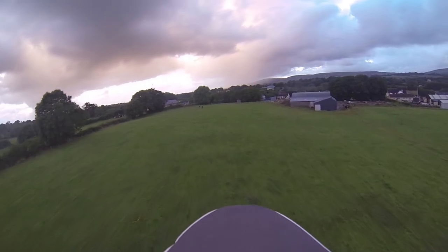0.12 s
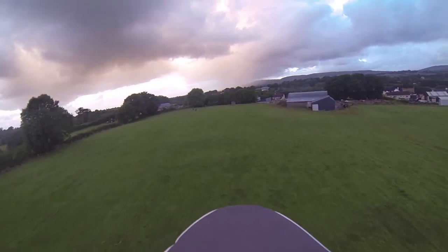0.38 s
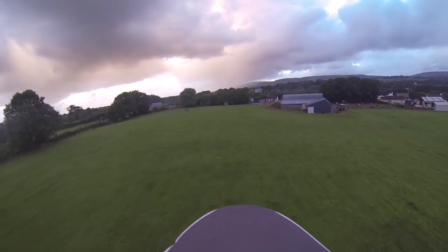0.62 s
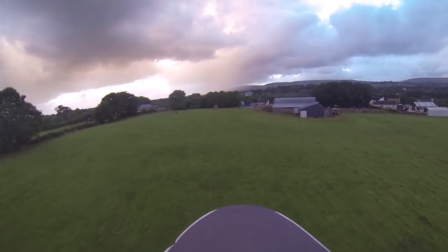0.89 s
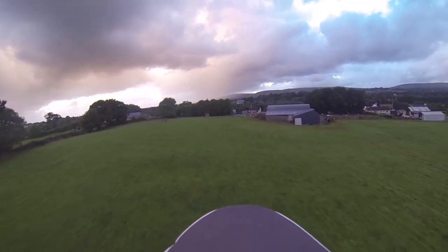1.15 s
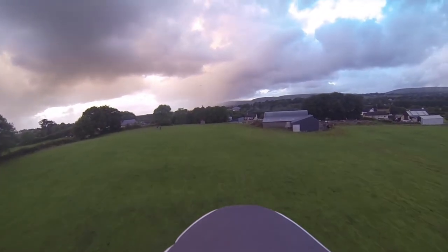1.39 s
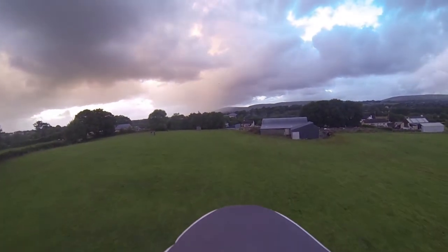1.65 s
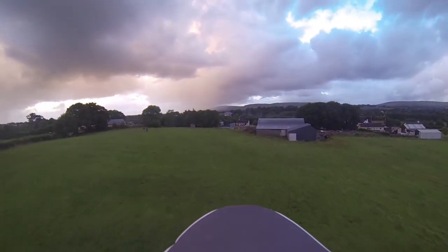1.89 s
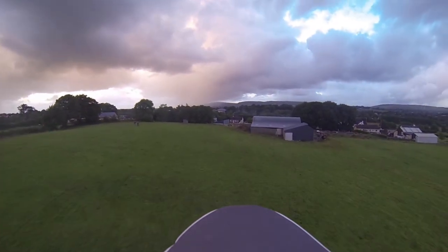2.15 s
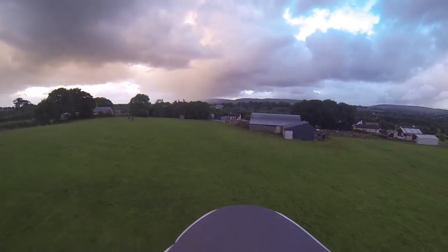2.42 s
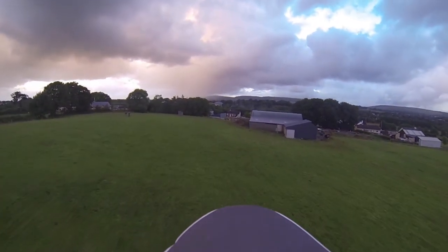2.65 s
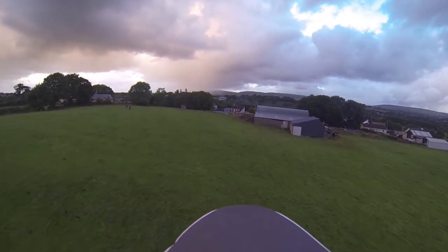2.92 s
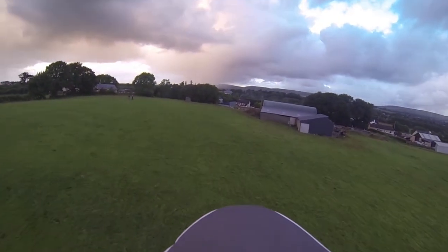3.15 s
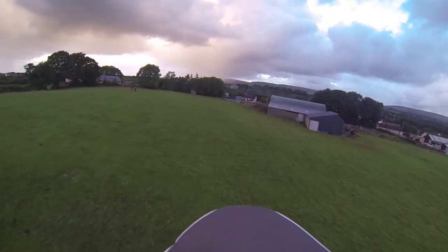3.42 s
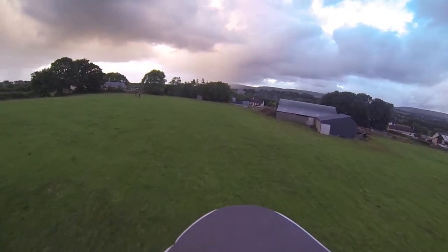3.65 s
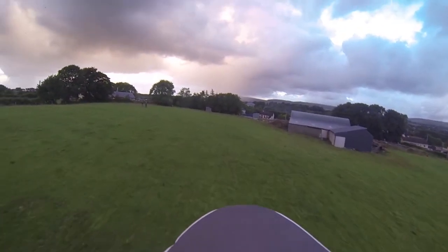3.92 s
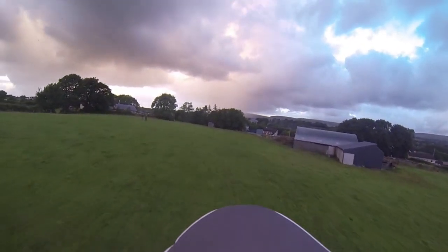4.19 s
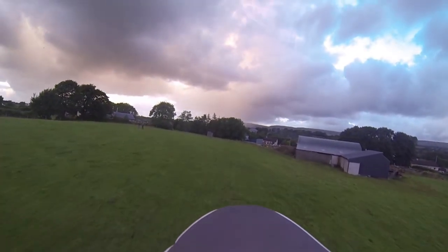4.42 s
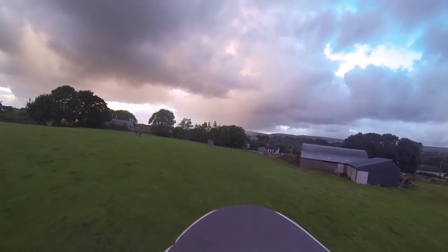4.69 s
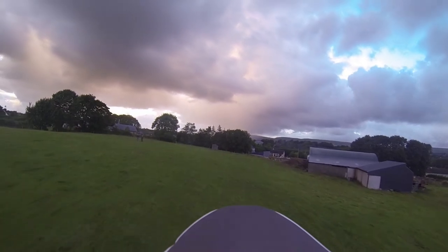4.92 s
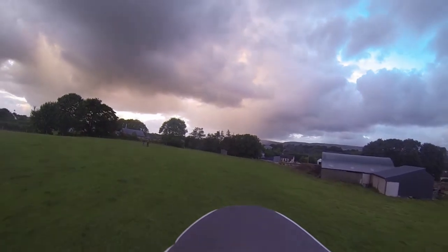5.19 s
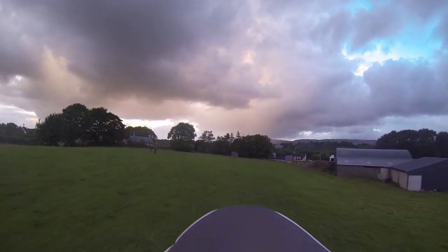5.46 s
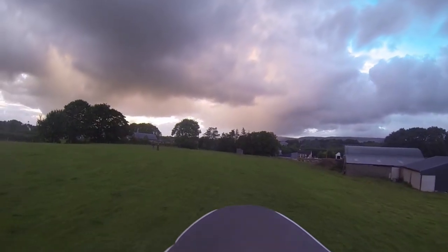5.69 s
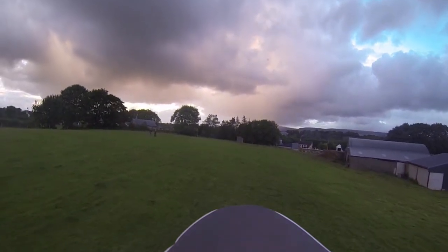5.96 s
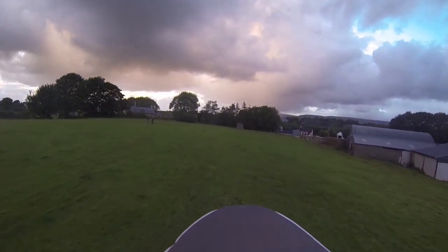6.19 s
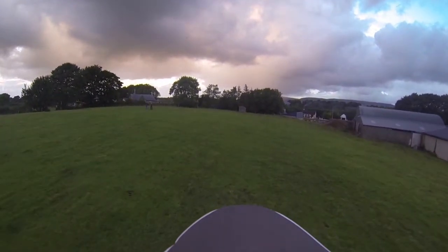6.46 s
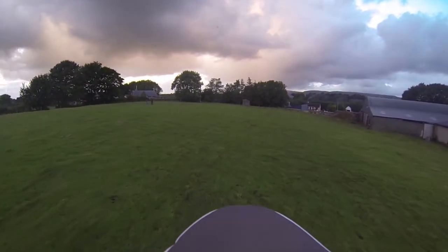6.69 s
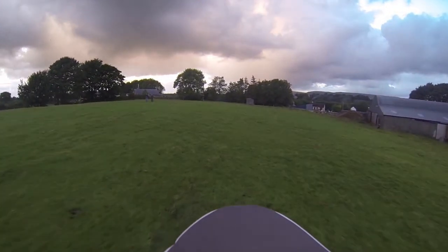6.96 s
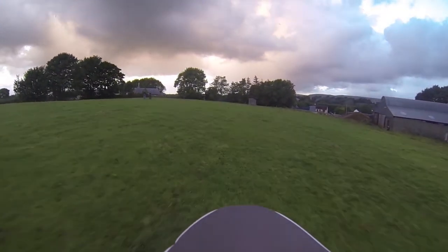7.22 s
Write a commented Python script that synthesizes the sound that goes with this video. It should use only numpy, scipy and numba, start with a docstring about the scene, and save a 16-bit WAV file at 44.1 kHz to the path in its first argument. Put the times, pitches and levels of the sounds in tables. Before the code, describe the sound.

Rushing airflow hiss with dense irregular wind thumps, tearing overload crackles and tiny servo ticks, heard aboard an unpowered gliding model plane.

```python
"""A small model aircraft glides over a field, motor idle, its microphone riding in the airstream.
From the start eddies buffet the port: one-sided pressure pulses trailed by low noise, with ragged bright bursts.
The slipstream is shaped noise with a cavity resonance; decaying modes tick, and servos chatter near 2.1 and 3.3 s.
The hiss surges near 3.6 s, sinks until about 5.5 s and partly recovers; the buffets continue to the end.
The hardest thumps overload the recorder, whose late limiter steps the gain and lets the tops clip."""
import sys
import numpy as np
from scipy import signal
from scipy.io import wavfile
from scipy.ndimage import uniform_filter1d
from numba import njit

SR = 44100
rng = np.random.default_rng(int(sys.argv[2]) if len(sys.argv) > 2 else 0)


def boost(x):
    """Linear amplitude factor 10**(x/20) for a level x in decibels (scalar or array-like)."""
    u = np.asarray(x, float) / 20
    return 10 ** u


def transcribe(signal):
    """Save signal, clipped to [-1, 1], as a 16-bit WAV file at the path in sys.argv[1]."""
    frames = np.atleast_2d(signal).T
    limited = np.clip(frames, -1, 1)
    pcm = np.round(limited * 32767).astype(np.int16)
    wavfile.write(sys.argv[1], SR, pcm)


N = 323694

# Airflow past the port: start_s, hiss_db, gustiness_db
AIRFLOW = [(0.0, -39.5, -4), (0.75, -40, 0), (0.94, -38, 0.5), (1.22, -39, -2), (1.47, -38.5, 2),
           (1.76, -41, -0.5), (2.4, -42, -1), (2.68, -41, -3.5), (3.07, -42.5, -2.5), (3.3, -41, -0.5),
           (3.45, -38.5, -2.5), (3.6, -36, -4), (3.68, -38, -0.5), (3.8, -43.5, -2.5), (4.05, -41.5, -0.5),
           (4.5, -42, -3.5), (4.9, -43, -1), (5.25, -46.5, -4), (5.55, -50, 0.5), (6.0, -48.5, -2.5),
           (6.5, -48, -2.5), (6.54, -46, -5), (6.75, -45, -1.5), (7.1, -46.5, -1), (7.34, -46, 4)]
# Noise density of the patchy mid rush, before normalization: frequency_hz, density_db (relative, per Hz)
RUSH_SPECTRUM = [(60, 3), (150, -0.5), (350, -1.5), (700, -6.5), (1400, -19.5), (2200, -27), (3200, -82),
                 (6000, -88)]
# Noise density of the slipstream hiss, before normalization: frequency_hz, density_db (relative, per Hz)
HISS_SPECTRUM = [(700, -8), (1100, 6), (1600, 4), (2200, -6), (3000, -8), (4500, -13.5), (5800, -12.5),
                 (7600, -32), (10000, -21), (12000, -15.5), (13200, -35.5), (15000, -46), (19000, -72)]
# Lone airframe ticks: start_s, level_db (nominal, before each mode's own level and scatter)
AIRFRAME_TICKS = [(0.7183, -38), (2.9314, -50), (4.0294, -49), (4.4912, -35), (5.1654, -46), (5.3956, -45),
                  (5.6396, -55), (5.7269, -50), (6.013, -47), (6.7346, -49)]
# Resonances rung by an airframe tick: frequency_hz, level_db, t60_s
AIRFRAME_MODES = [(9800, -17, 0.0033), (11500, 0, .003), (12400, -6, .003), (13800, -13, .003)]
# Servo movements, heard as runs of gear ticks: start_s, length_s, level_db (nominal)
SERVO_RUNS = [(2.09, .007, -37), (2.113, .036, -41), (3.21, .009, -39), (3.25, .006, -35),
              (3.271, .016, -39), (3.297, .02, -41)]
# Resonances rung by a gear tooth: frequency_hz, level_db, t60_s
SERVO_MODES = [(11800, -9, .005), (12600, -6, .005), (9400, -16, 0.0046)]
# Bursts where an eddy tears over the port's edge: start_s, held_ms, level_db
TEARING_BURSTS = [(0.151, 2.3, -28.5), (0.176, 4.0, -34), (0.189, 3.2, -26), (0.266, 2.0, -35),
                  (0.289, 8, -31.5), (0.333, 3.6, -25), (0.409, 10.0, -34), (0.889, 2.0, -33.0),
                  (0.905, 6, -25), (0.925, 3.0, -28), (1.0, 2.0, -33), (1.175, 3.4, -21.5),
                  (1.189, 3.6, -24), (1.404, 29, -28.5), (1.454, 14, -26.5), (1.478, 6.7, -28),
                  (1.498, 6.4, -25), (1.545, 2.2, -30), (1.559, 3.0, -25), (1.789, 4.0, -28),
                  (1.882, 2.0, -29), (1.961, 2.0, -28), (2.15, 7.1, -33.5), (2.257, 18.0, -35),
                  (2.323, 13.0, -29), (2.423, 5.0, -27), (2.467, 4.1, -27.5), (2.485, 5.0, -33.5),
                  (2.677, 7.0, -30), (3.405, 3.0, -30), (3.631, 6.0, -34), (3.658, 9.0, -35),
                  (3.775, 4.0, -36), (4.044, 4.0, -32), (4.121, 14.0, -35.5), (4.273, 4.0, -30),
                  (4.334, 2.0, -29.5), (4.382, 4.0, -35), (4.476, 4.0, -32.5), (4.568, 3.0, -27),
                  (4.593, 3.0, -32), (4.689, 31.0, -33.0), (4.723, 6.9, -25), (4.763, 3.0, -30),
                  (4.778, 8.4, -30.5), (4.898, 11.4, -29.5), (4.932, 10.0, -33.0), (5.025, 4.5, -35.0),
                  (5.066, 4.0, -30), (5.258, 1.7, -31.5), (5.362, 10, -34.5), (5.454, 12, -35),
                  (6.043, 10.0, -33.5), (6.143, 8.0, -42), (6.229, 6.0, -43), (6.249, 2.8, -35.0),
                  (6.325, 2.7, -34), (6.732, 21.0, -34), (6.746, 7.0, -42), (6.833, 5.0, -39),
                  (7, 3.0, -38), (7.118, 3.0, -35.5), (7.252, 4.0, -29.5), (7.325, 5.0, -33)]
# Noise density of the tearing, before normalization: frequency_hz, density_db (relative, per Hz)
TEARING_SPECTRUM = [(450, -17), (750, 5), (1100, 5.5), (1600, -5), (2400, -12), (3600, -24), (6000, -52)]
# Buffets on the port: crest_s, pressure (1 = full scale before the recorder, negative = suction),
# width_ms (nominal), flutter_db (turbulence behind the crest)
BUFFETS = [(0.153, 0.85, 5, -15.5), (0.1798, 0.72, 4.1, -21), (0.1878, -0.37, 2.8, -28),
           (0.2574, 0.71, 6.3, -14), (0.263, 0.69, 4.3, -15), (0.283, 0.58, 2.5, -17.5),
           (0.3259, 0.62, 8.9, -21), (0.374, 0.12, 2.4, -18), (0.4001, 1.03, 4.7, -14),
           (0.4802, 0.4, 6.6, -20), (0.6062, 0.84, 6.1, -13), (0.8908, -1.1, 2.9, -26),
           (0.8931, 1.3, 5.1, -19), (0.9125, 0.51, 3.8, -17.5), (0.953, 0.9, 3.5, -20),
           (0.9958, -0.4, 2.7, -32), (1.0023, 1.5, 1.64, -14), (1.049, 0.098, 3.5, -30),
           (1.06, 0.12, 2.3, -25), (1.168, 0.9, 3.7, -11.5), (1.172, 0.2, 4.1, -12.5),
           (1.191, 2.1, 2.65, -22), (1.227, -0.94, 3, -19), (1.2277, 0.74, 7.3, -18.5),
           (1.2986, 0.2, 7.7, -22), (1.324, 0.64, 3.6, -23), (1.3555, 0.39, 2.6, -28),
           (1.374, 1.4, 1.75, -22), (1.3771, -1.5, 2.3, -16), (1.3802, 1.46, 6.9, -22),
           (1.406, 0.93, 4.1, -23), (1.4113, 0.83, 1.8, -19), (1.4496, 1, 3.5, -15),
           (1.4553, 0.53, 2.2, -22), (1.5, -0.4, 4.2, -28), (1.5038, 1.14, 5.3, -31),
           (1.5467, -0.71, 1, -31), (1.5509, 1.25, 4.5, -23), (1.7328, -0.19, 2.3, -22),
           (1.735, 0.81, 2.6, -20.5), (1.7791, 1.03, 5.4, -13), (1.7946, 0.82, 3.3, -23),
           (1.872, 0.43, 4.8, -17), (1.9263, 0.64, 3.7, -21), (1.9593, 0.7, 3.3, -16.5),
           (1.9654, 0.6, 5.8, -28), (2.09, 0.57, 2.8, -21.5), (2.137, -0.64, 1.55, -21),
           (2.1402, 0.055, 5.3, -18.5), (2.2238, 0.47, 8.6, -23), (2.259, 0.78, 2.5, -18.5),
           (2.313, -0.75, 1.6, -22), (2.3154, 0.87, 5.6, -23), (2.3295, 0.79, 1.9, -23),
           (2.4008, 0.6, 4.3, -25), (2.423, 0.56, 3.8, -27), (2.4293, 0.64, 4, -19),
           (2.4466, -0.58, 2, -22), (2.474, 0.7, 4.3, -19.5), (2.6709, 0.65, 3, -15),
           (2.78, 0.64, 2.8, -28), (2.818, 0.54, 8.4, -16), (2.9452, 0.84, 3.5, -17.5),
           (2.9664, -0.9, 3, -20), (2.9686, 0.46, 3, -25), (3.0148, 0.45, 3, -22), (3.367, -0.34, 3.6, -30),
           (3.4063, 0.58, 5.4, -31), (3.602, 0.67, 5.3, -18), (3.6312, 0.7, 5.7, -17.5),
           (3.663, -0.78, 4.7, -15), (3.6684, 0.69, 4.6, -15.5), (3.7003, 0.37, 4.9, -26),
           (3.704, -1.12, 2.2, -32), (3.7071, 0.72, 4.9, -24), (3.7345, 0.56, 6.9, -27),
           (3.754, 0.64, 5.4, -18), (3.7711, 1.07, 5.4, -14), (3.929, 0.64, 5.7, -18),
           (4.04, 0.29, 1.1, -25), (4.0416, -0.55, 1.3, -20), (4.047, 0.72, 5.3, -24),
           (4.1247, 0.5, 6.1, -21.5), (4.1918, 0.51, 5.2, -21.5), (4.2646, 0.62, 4.2, -21.5),
           (4.2782, 1.97, 2.36, -25), (4.3783, 0.6, 5.6, -16), (4.4787, 0.6, 2.7, -15),
           (4.492, 0.67, 3.8, -23.5), (4.567, 0.39, 4.3, -20), (4.5942, 0.67, 2.2, -16.5),
           (4.639, 0.44, 2.5, -36), (4.6864, 0.78, 5.3, -28), (4.6872, -0.79, 2.1, -13.5),
           (4.6895, 1.05, 2, -21), (4.7132, 0.53, 4.6, -15.5), (4.7156, -0.54, 2.1, -14.5),
           (4.72, 0.55, 5.5, -18), (4.7686, 0.51, 3.5, -20), (4.7777, 1.1, 1.8, -25),
           (4.7796, -0.41, 1.9, -26), (4.7828, 0.98, 3.5, -19), (4.8046, 0.68, 2.8, -21),
           (4.8075, -0.41, 1.4, -17.5), (4.8396, 0.82, 5.5, -20), (4.8759, 1.4, 2.3, -20),
           (4.9, 0.52, 3.1, -13.5), (4.9387, 0.59, 3.5, -25), (4.982, 1.6, 2.56, -40),
           (5.021, 0.69, 6, -17.5), (5.052, 0.38, 5.2, -23.5), (5.0685, 0.99, 3, -16),
           (5.1451, 1.03, 4.7, -29.5), (5.1503, -0.84, 3.4, -19.5), (5.207, 0.96, 3.9, -20.5),
           (5.2617, 1.04, 3, -20), (5.3613, 0.52, 1.1, -17.5), (5.3654, 0.53, 2.6, -24),
           (5.3681, 0.48, 1.1, -24), (5.459, 0.73, 1, -17), (5.4638, 0.47, 2.1, -22),
           (5.527, 0.89, 6.4, -17), (5.7241, 0.46, 5.1, -22.5), (5.765, 0.39, 4.4, -20.5),
           (5.809, 0.46, 9.3, -31), (5.8481, 0.72, 2.5, -22), (5.9227, 0.37, 7, -20),
           (5.93, 0.47, 4.2, -21.5), (5.959, 0.36, 4.8, -27), (5.996, 0.39, 6.5, -23.5),
           (6.0441, 1.08, 5.1, -17), (6.1438, 0.58, 5.5, -15), (6.2296, 0.67, 3.7, -18.5),
           (6.2512, -0.84, 1.7, -20.5), (6.326, 0.9, 2.8, -16.5), (6.3968, 0.73, 1.6, -29),
           (6.5218, 0.39, 11, -20), (6.578, 0.33, 5.7, -24), (6.6728, 0.48, 5.6, -21.5),
           (6.7018, 0.49, 5, -18), (6.7429, -0.48, 1.5, -22), (6.748, 0.4, 6, -18), (6.771, 0.47, 5.8, -35),
           (6.801, 0.48, 4.9, -37), (6.8356, 0.68, 2.2, -20), (6.873, 0.35, 3.4, -24),
           (6.9137, 0.79, 4.1, -19.5), (6.9393, -0.36, 4, -15.5), (6.9465, 0.53, 3.1, -36),
           (6.999, 0.54, 1.1, -15), (7.0053, 1, 4.4, -30), (7.0899, -0.72, 1.95, -36),
           (7.092, 0.61, 7.7, -23), (7.1186, 0.98, 3.2, -19.5), (7.2518, 0.88, 1.66, -21),
           (7.256, 0.67, 4.2, -24), (7.324, 0.65, 1.55, -18.5)]
# Noise density of the flutter, before normalization: frequency_hz, density_db (relative, per Hz)
FLUTTER_SPECTRUM = [(100, -25), (200, 5), (450, -3.5), (900, -14), (1600, -30.5), (3200, -45)]

# Levels at mean airflow and zero gustiness; each follows a share of the hiss's swing in dB
RUSH_DB, RUSH_FOLLOWS = -28, 0.82
EDDY_DB, EDDY_FOLLOWS = -20.5, 0.64
TREBLE_HZ, TREBLE_FOLLOWS = 7200, 0.36  # extra share above this frequency: faster air hisses brighter
STIR_SHARE, LULL_DB = 0.3, -5.5  # rush follows this share of the eddies' swing, floored at LULL_DB beforehand
CAVITY_HZ, CAVITY_WIDTH_HZ, CAVITY_DB = 3770, 540, -8.5  # mean level relative to the hiss
EDDIES_PER_S, EDDY_LOW_PASS_HZ, EDDY_HIGH_PASS_HZ = 150, 54.5, 22.3
TEETH_PER_S = 330
TEARING_SWELL_S, TEARING_FALL_S = 0.00097, 0.004
FLUTTER_SWELL_S, FLUTTER_FALL_S = 0.0048, 0.014
BASS_CUT_HZ, OFFSET, CLIP_LEVEL = 10, 0.022, 0.992
LIMIT, STEP_DB, STEP_SAMPLES, LATE_SAMPLES = 0.97, 0.45, 6.5, 44
RELEASE_DB_PER_S = 188


def rms_one(x):
    """Normalization: the mean power becomes one."""
    return x / np.sqrt(np.mean(x ** 2) + 1e-20)


def cut(x, hz, kind, order=2):
    """Linear filtering: a Butterworth response is flat in its pass band."""
    return signal.sosfilt(signal.butter(order, hz, kind, fs=SR, output="sos"), x)


def in_time(rows):
    """Linear interpolation: each column becomes a continuous course over time."""
    s, *columns = np.transpose(rows)
    return [np.interp(np.arange(N) / SR, s, column) for column in columns]


def drift(rate_hz):
    """Slow random fluctuation: noise through a double one-pole low-pass, scaled to rms 1."""
    pole = np.exp(-2 * np.pi * rate_hz * 40 / SR)  # computed at every 40th sample
    noise = rng.standard_normal(N // 40 + 2002)
    slow = signal.lfilter([1], [1, -2 * pole, pole ** 2], noise)[2000:]  # settled part only
    return np.interp(np.arange(N) / 40, np.arange(len(slow)), rms_one(slow))


def banded_noise(spectrum, shared_db, own_db):
    """Turbulent noise: third-octave bands fluctuate partly together, partly alone; overall rms 1."""
    together = drift(16.4) + 1.47 * drift(200)
    white = rng.standard_normal((2, N))
    table_hz, table_db = np.transpose(spectrum)
    edges = 2 ** np.arange(np.log2(table_hz[0]), np.log2(table_hz[-1]), 1 / 3)
    out = 0
    for k, (low, high) in enumerate(zip(edges, edges[1:])):
        density_db = np.interp(np.log(low * high) / 2, np.log(table_hz), table_db)
        band_db = density_db + shared_db * together + own_db * drift(6.4)
        # neighbouring bands take independent noise
        out = out + boost(band_db) * cut(white[k % 2], [low, high], "band")
    return rms_one(out)


def cavity_whistle(brightness_db):
    """Cavity resonance: a two-pole resonator before the capsule selects a broad whistle from noise."""
    r, w = np.exp(-np.pi * CAVITY_WIDTH_HZ / SR), 2 * np.pi * CAVITY_HZ / SR
    resonance = [1, -2 * r * np.cos(w), r * r]
    whistle = signal.lfilter([1, 0, -1], resonance, rng.standard_normal(N))
    level_db = CAVITY_DB + brightness_db + 0.85 * drift(40)
    return boost(level_db) * rms_one(cut(whistle, [2500, 5500], "band"))


def slipstream(rush_db, hiss_db):
    """Flow noise: a patchy mid rush joins a smoother hiss whose treble grows faster with airflow."""
    rush = boost(rush_db) * banded_noise(RUSH_SPECTRUM, shared_db=1.0, own_db=-0.5)
    brightness_db = TREBLE_FOLLOWS * (hiss_db - hiss_db.mean())
    whistle = cavity_whistle(brightness_db)
    hiss = banded_noise(HISS_SPECTRUM, shared_db=0.8, own_db=0.4)
    treble = cut(hiss, TREBLE_HZ, "high", order=4)
    hiss = cut(hiss, TREBLE_HZ, "low", order=4) + boost(brightness_db) * treble
    return rush + boost(hiss_db) * (hiss + whistle)


def strike(s, level_db, modes):
    """Modal excitation: every blow rings the same decaying modes with strengths of its own."""
    out, chance = np.zeros(N), rng.standard_normal((len(s), len(modes)))
    for k, (hz, mode_db, t60) in enumerate(modes):
        clicks = np.full(N, 1e-18)  # tiny floor keeps the filter out of denormals
        clicks[(s * SR).astype(int)] = boost(level_db + mode_db + 2.6 * chance[:, k])
        r, w = boost(-60 / (t60 * SR)), 2 * np.pi * hz / SR
        out += signal.lfilter([0, np.sin(w)], [1, -2 * r * np.cos(w), r * r], clicks)
    return out


def airframe_ticks():
    """Impulse response: lone blows excite the airframe's short modes."""
    return strike(*np.transpose(AIRFRAME_TICKS), AIRFRAME_MODES)


def servo_chatter():
    """Periodic impact: gear teeth meet almost evenly while a servo moves."""
    teeth = []
    for start, length, level_db in SERVO_RUNS:
        for s in np.arange(start, start + length, 1 / TEETH_PER_S):
            teeth.append((s, level_db))
    teeth = np.array(teeth) + rng.standard_normal((len(teeth), 2)) * [0.0003, 1.5]  # scatter in s, dB
    return cut(strike(*np.transpose(teeth), SERVO_MODES), 12000, "low", order=6)


def small_eddies(level_db):
    """Random pulse superposition: weak eddies arrive by chance, mostly pushing, as smooth lumps."""
    born = rng.random(N) < EDDIES_PER_S / SR
    sizes = boost(2.2 * np.minimum(rng.exponential(1, N), 2.5))
    signs = np.where(rng.random(N) < 0.62, 1, -1)
    lumps = cut(born * sizes * signs + 1e-18, EDDY_LOW_PASS_HZ, "low", order=1)
    lumps = cut(lumps, 3.26 * EDDY_LOW_PASS_HZ, "low")
    return boost(level_db) * rms_one(cut(lumps - lumps.mean(), EDDY_HIGH_PASS_HZ, "high"))


def tearing_bursts():
    """Edge turbulence: dense bright noise sets in fast, holds evenly and decays within milliseconds."""
    envelope, t = np.zeros(N), np.arange(N) / SR
    for s, held_ms, level_db in TEARING_BURSTS:
        near = slice(max(round((s - 0.02) * SR), 0), round((s + 0.07) * SR))
        before = np.minimum(t[near] - s, 0)
        after = np.maximum(t[near] - s - held_ms / 1000, 0)
        shape = np.exp(-(before / TEARING_SWELL_S) ** 2 - after / TEARING_FALL_S)
        envelope[near] = np.maximum(envelope[near], boost(level_db) * shape)
    tearing = banded_noise(TEARING_SPECTRUM, shared_db=0, own_db=-0.2)
    evened = tearing / np.sqrt(uniform_filter1d(tearing ** 2, size=220) + 1e-9)  # power over 5 ms
    return envelope * evened


def buffets():
    """Eddy pressure pulse: a slight draw, a fast rise, a slower sag and a rebound, shedding low flutter."""
    push, flutter, t = np.zeros(N), np.zeros(N), np.arange(N) / SR
    for s, pressure, width_ms, flutter_db in BUFFETS:
        near = slice(max(round((s - 0.03) * SR), 0), round((s + 0.08) * SR))
        since = t[near] - s
        before, after = np.minimum(since, 0), np.maximum(since, 0)
        width = width_ms / 1000
        draw = 0.12 * np.exp(-((since + 1.1 * width) / (0.6 * width)) ** 2)
        crest = np.exp(-(before / (0.45 * width)) ** 2) / (1 + (after / (0.7 * width)) ** 2)
        # wider pushes swing back deeper
        rebound = 36 * width * np.exp(-((since - 0.015) / 0.008) ** 2)
        push[near] += pressure * (crest - draw - rebound)
        swell = np.exp(-(before / FLUTTER_SWELL_S) ** 2) * (1 - 0.48 * crest)  # the crest is smoother
        trail = boost(flutter_db) * swell * np.exp(-after / FLUTTER_FALL_S)
        flutter[near] = np.maximum(flutter[near], trail)
    return push + flutter * banded_noise(FLUTTER_SPECTRUM, shared_db=-0.77, own_db=1.03)


def scene():
    """Superposition: the sources add at the port, with one airflow governing rush, hiss and eddies."""
    hiss_db, gust_db = in_time(AIRFLOW)
    swing_db = hiss_db - hiss_db.mean()
    eddy_db = EDDY_DB + EDDY_FOLLOWS * swing_db + gust_db
    eddies = small_eddies(eddy_db)
    # the rush swells with each passing eddy, through its power over 12 ms
    eddy_power = uniform_filter1d(eddies ** 2, size=530)
    stir_db = 10 * np.log10(eddy_power + 1e-9) - eddy_db
    rush_db = RUSH_DB + RUSH_FOLLOWS * swing_db + gust_db
    rush_db = rush_db + STIR_SHARE * np.maximum(stir_db, LULL_DB)
    air = slipstream(rush_db, hiss_db)
    mix = air + eddies + airframe_ticks() + servo_chatter() + tearing_bursts() + buffets()
    return mix[None]


@njit
def stepped_limiter(x, limit, step, due, late, recover):
    """Delayed feedback: the output's excess is seen late and cut in small hard gain steps, which click."""
    out, gain = np.zeros_like(x), 1.
    for i in range(late, len(x)):
        if abs(out[i - late]) <= limit:
            gain = min(gain * recover, 1.)
        elif due[i]:
            gain *= step
        out[i] = gain * x[i]
    return out


def top_cut(x):
    """Nothing passes above the cut-off."""
    return signal.sosfilt(signal.butter(12, 15710, fs=SR, output="sos"), x)


def record(dry):
    """Overload: after a bass cut and a small offset, the limiter ducks too late and the tops clip."""
    x = cut(dry[0], BASS_CUT_HZ, "high") + OFFSET
    # gain steps fall a little unevenly
    due = np.diff(np.cumsum(rng.uniform(0, 2, N + 1)) // STEP_SAMPLES) > 0
    x = stepped_limiter(x, LIMIT, boost(-STEP_DB), due, LATE_SAMPLES, boost(RELEASE_DB_PER_S / SR))
    clipped = np.clip(x, -CLIP_LEVEL, CLIP_LEVEL)
    return top_cut(clipped[None])


dry = scene()
out = record(dry)
transcribe(out)
```